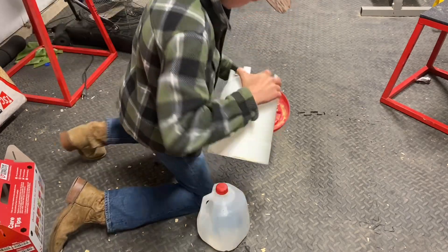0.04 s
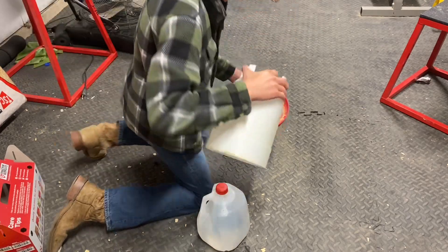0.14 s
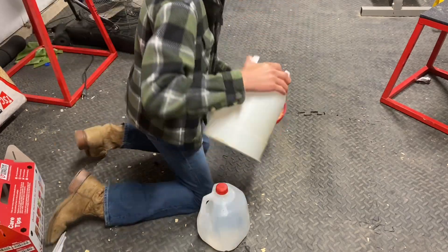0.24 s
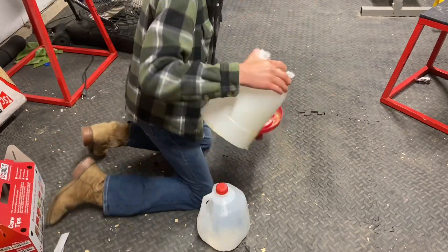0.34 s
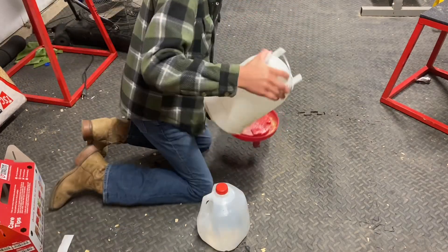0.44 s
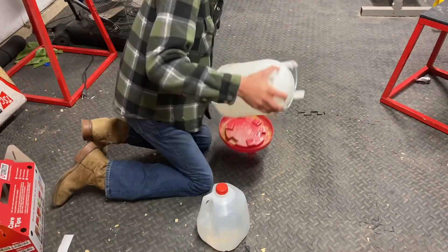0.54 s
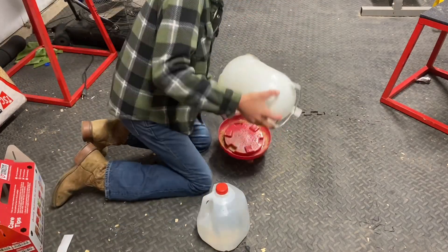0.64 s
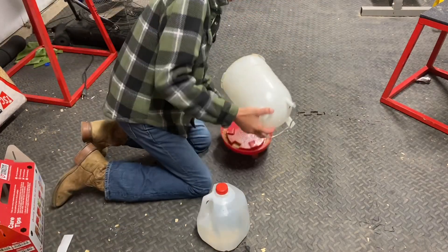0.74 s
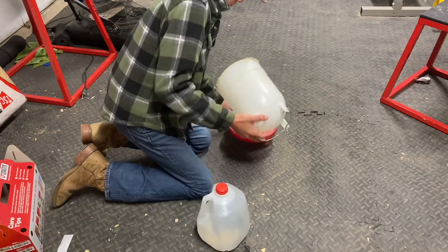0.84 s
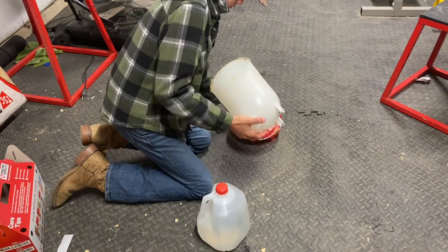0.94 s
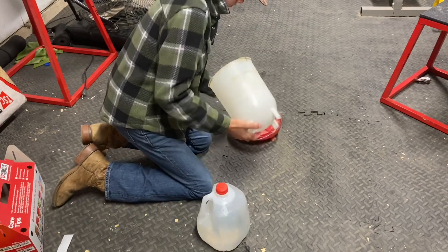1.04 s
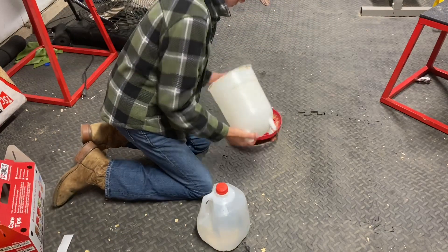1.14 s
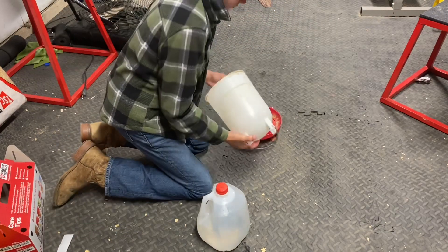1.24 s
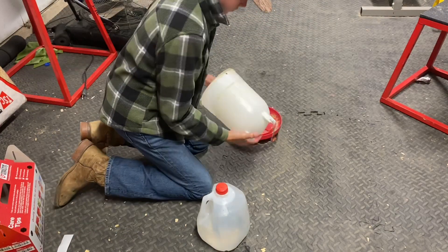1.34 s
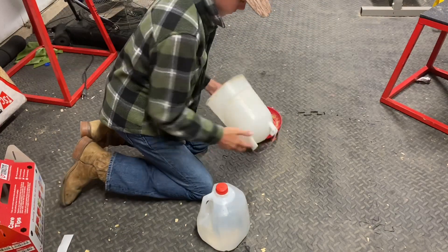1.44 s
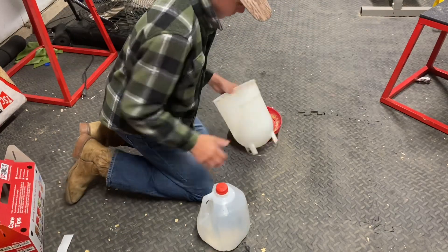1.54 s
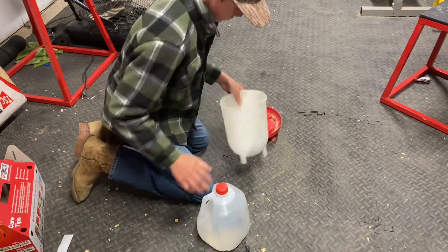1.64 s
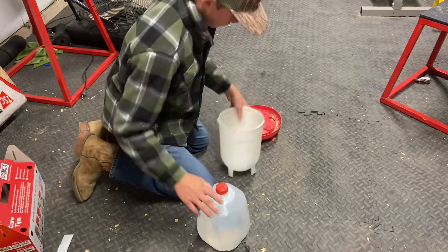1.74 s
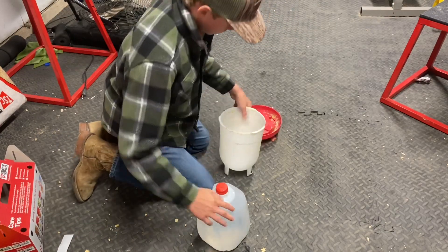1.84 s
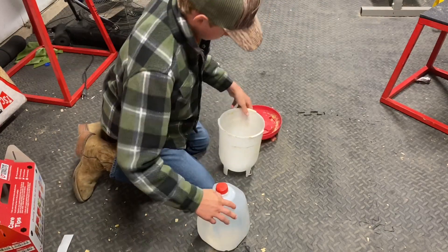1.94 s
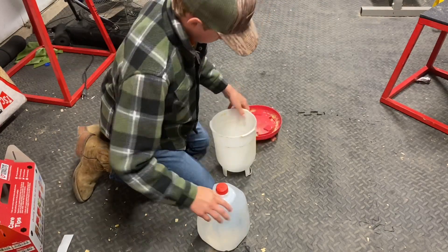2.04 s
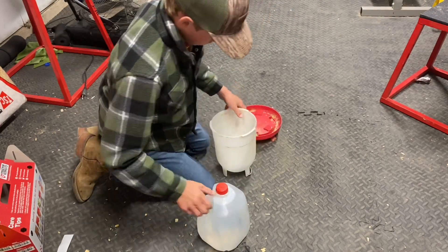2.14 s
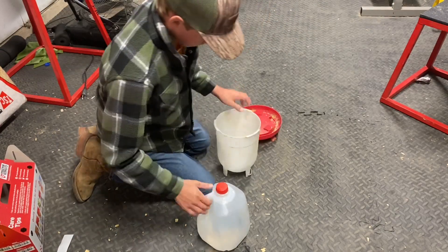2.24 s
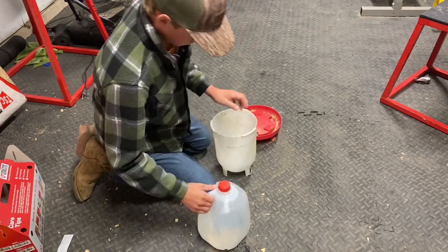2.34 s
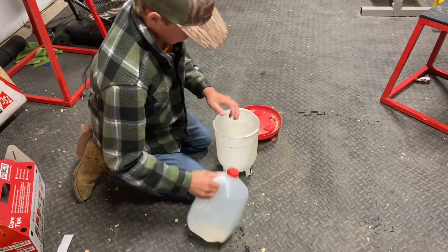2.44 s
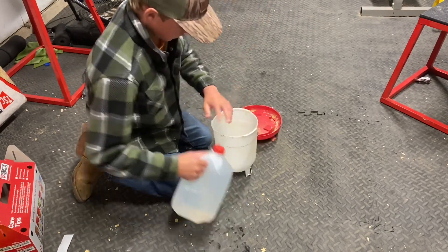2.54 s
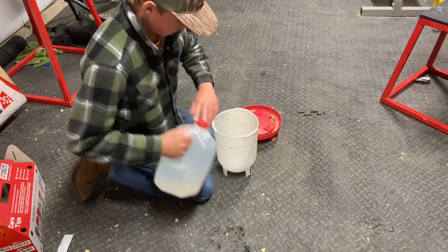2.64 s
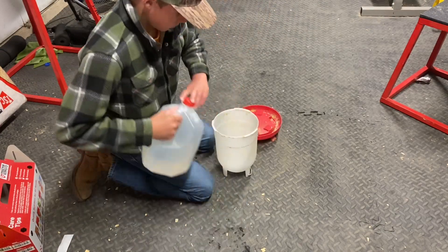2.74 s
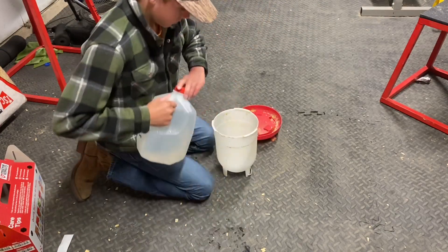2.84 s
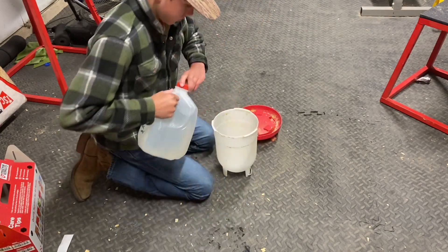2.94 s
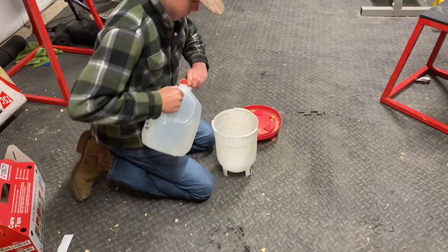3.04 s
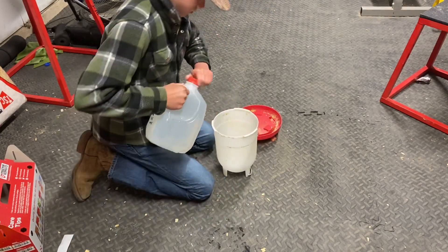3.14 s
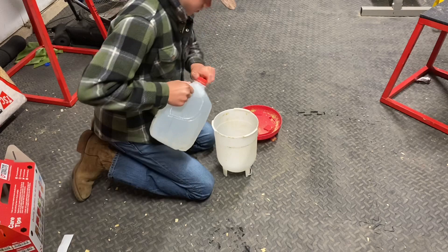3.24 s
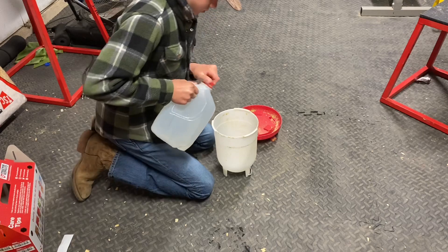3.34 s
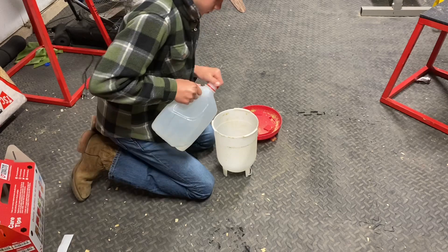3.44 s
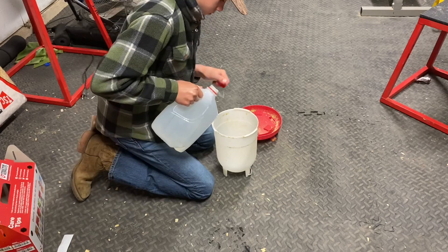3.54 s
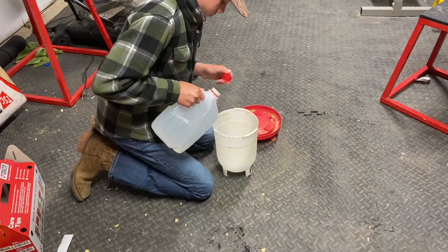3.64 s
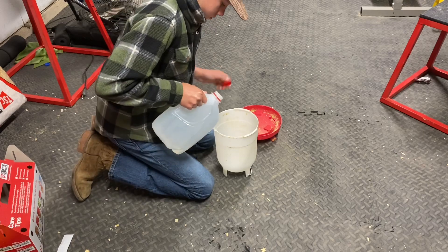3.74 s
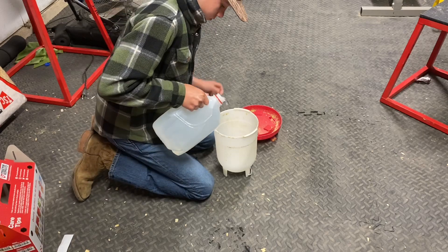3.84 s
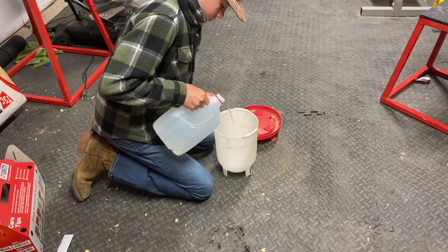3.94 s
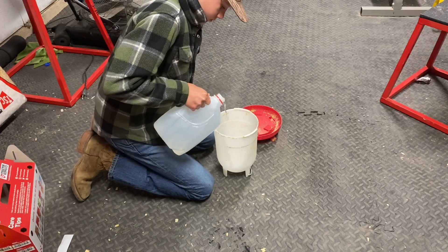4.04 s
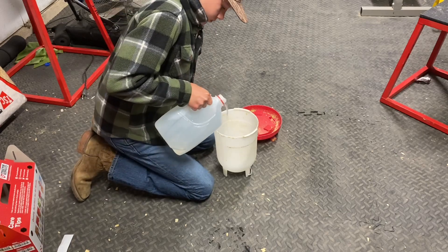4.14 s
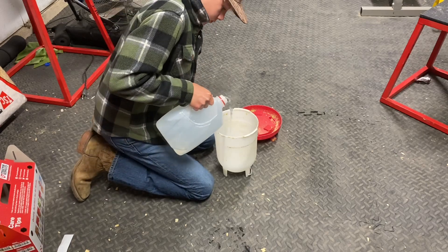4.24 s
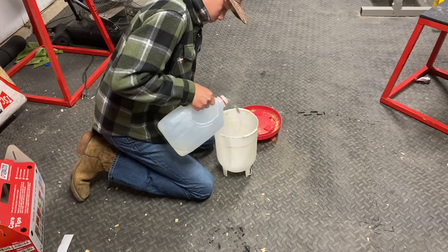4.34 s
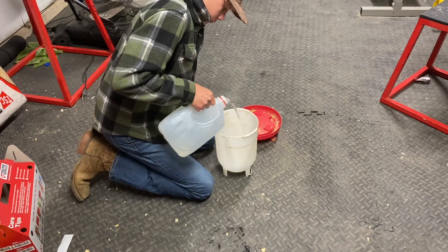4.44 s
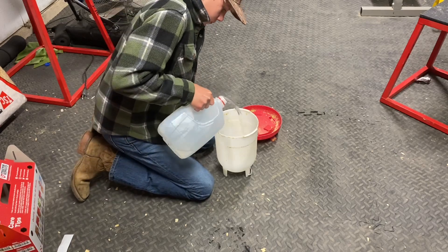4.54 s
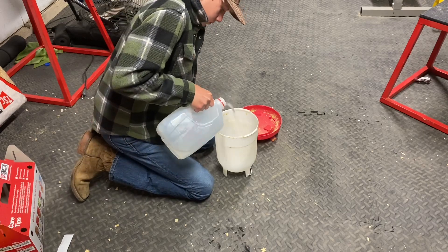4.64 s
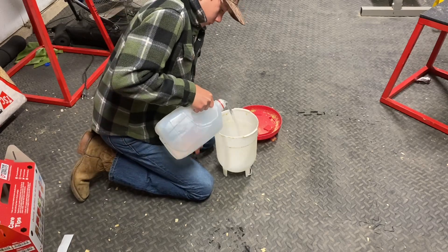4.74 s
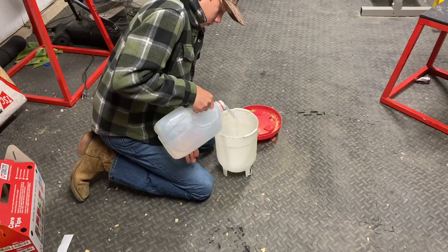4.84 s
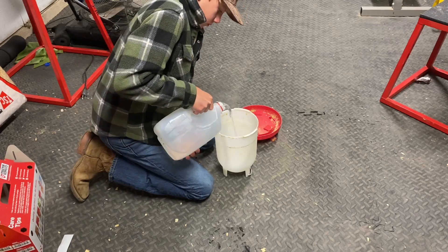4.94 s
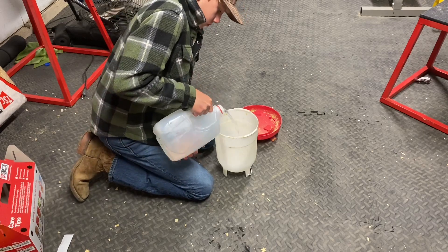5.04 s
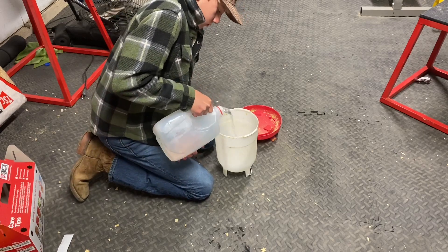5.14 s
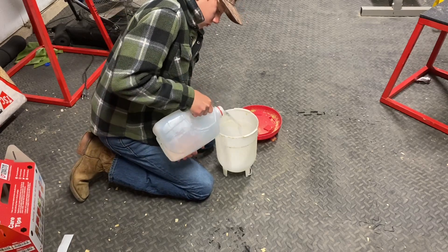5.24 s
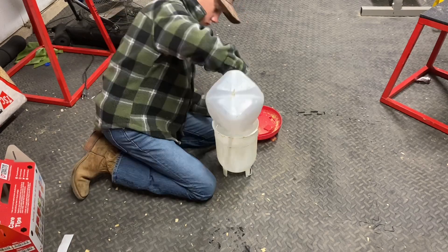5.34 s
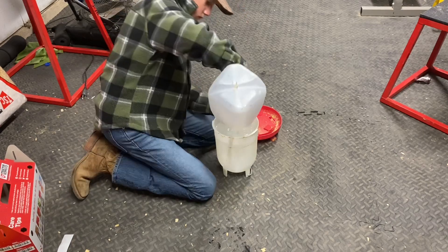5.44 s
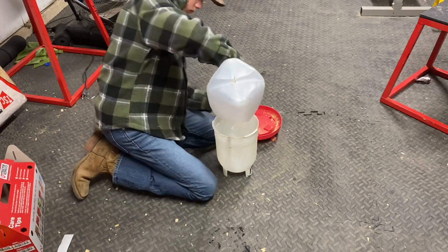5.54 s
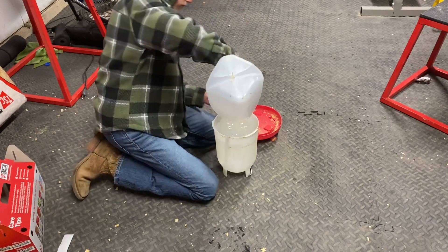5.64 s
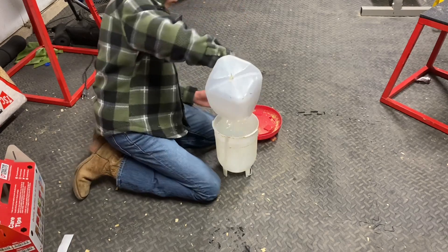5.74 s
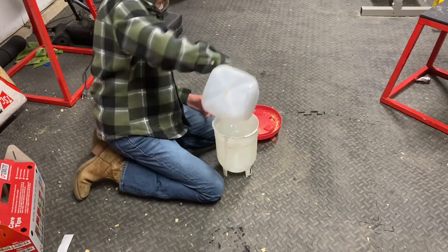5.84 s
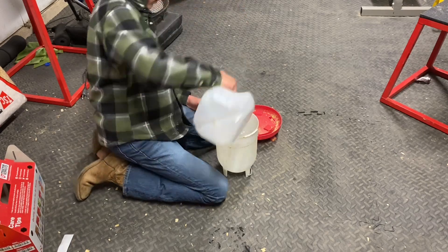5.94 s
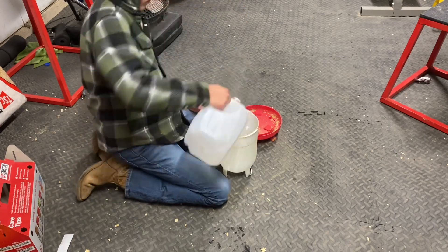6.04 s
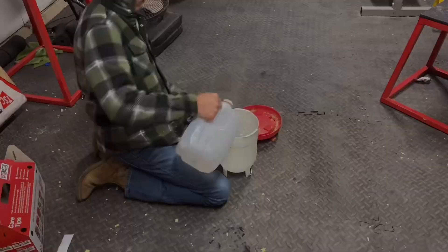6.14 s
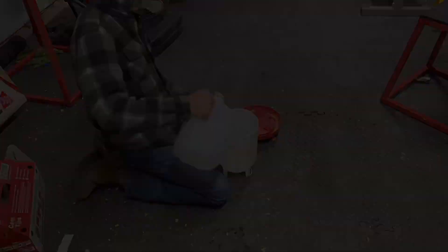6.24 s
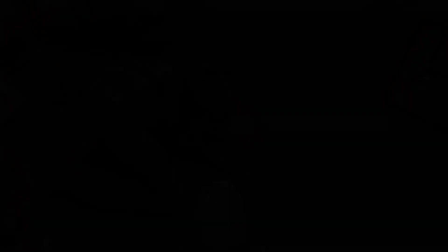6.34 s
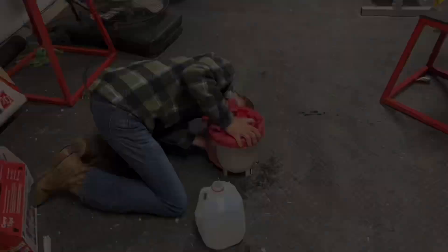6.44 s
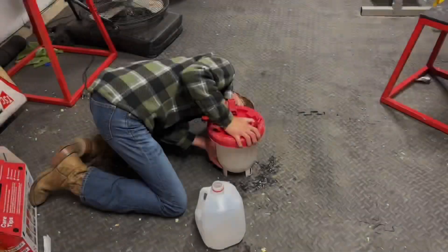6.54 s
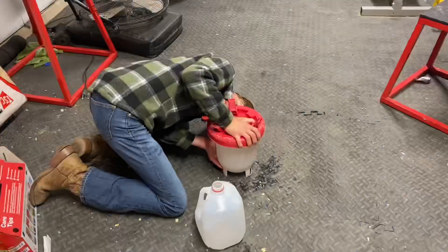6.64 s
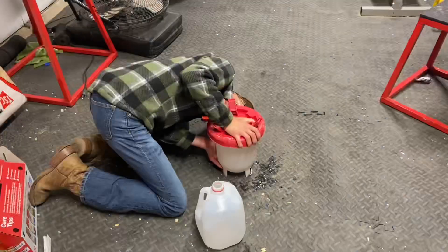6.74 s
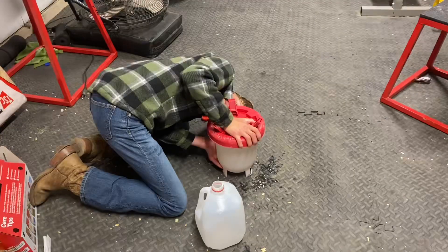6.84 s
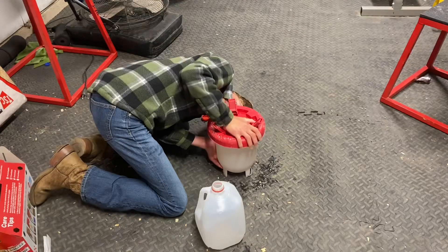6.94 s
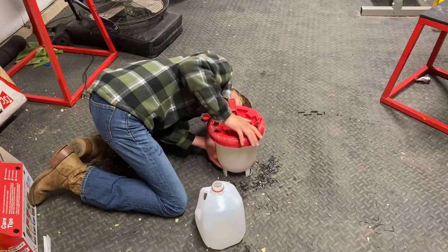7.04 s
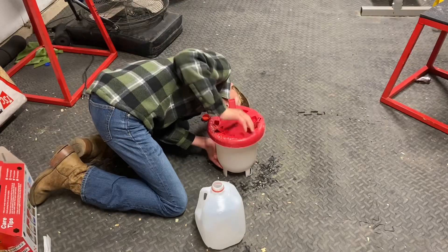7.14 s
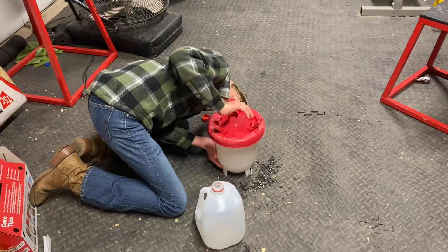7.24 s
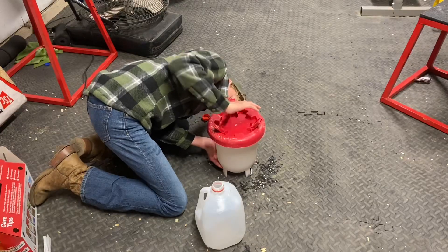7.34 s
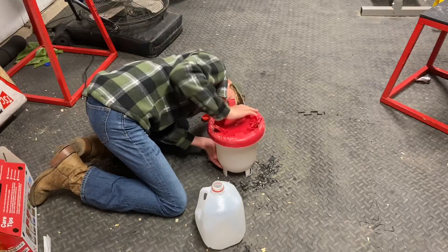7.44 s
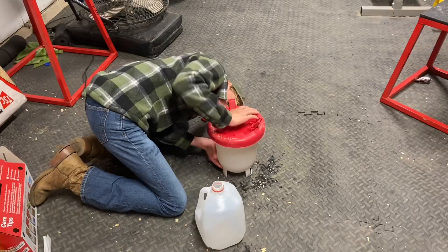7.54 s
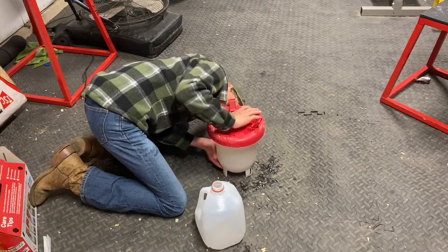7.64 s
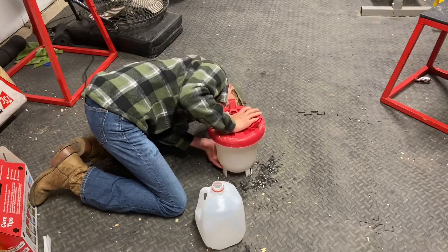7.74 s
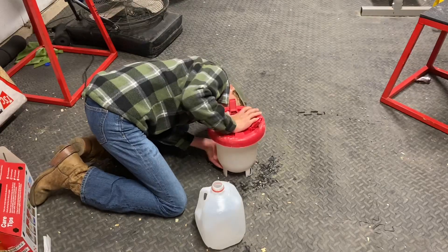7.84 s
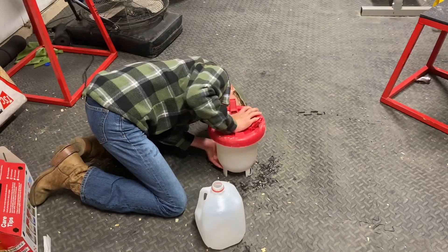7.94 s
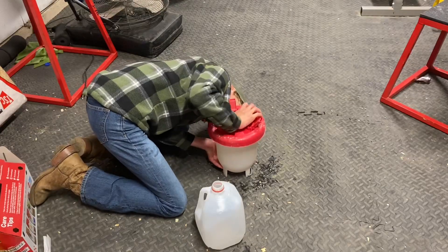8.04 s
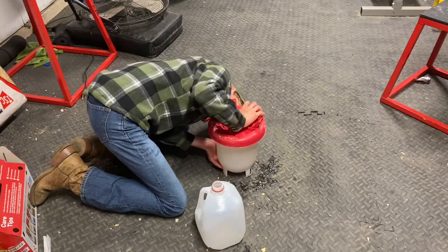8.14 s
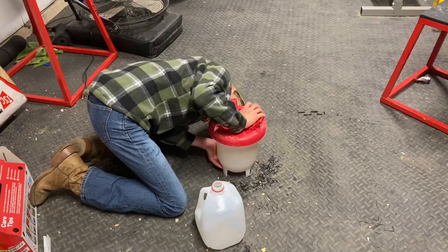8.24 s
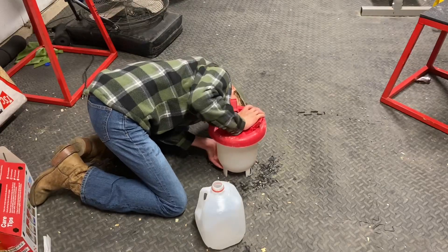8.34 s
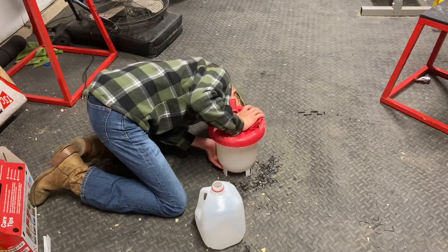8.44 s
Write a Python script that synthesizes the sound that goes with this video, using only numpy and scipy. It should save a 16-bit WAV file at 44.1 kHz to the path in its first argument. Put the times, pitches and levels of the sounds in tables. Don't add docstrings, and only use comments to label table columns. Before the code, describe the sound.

Hollow plastic vessel clatters and booms on a rubber floor, water pours with plops and glugs, then a base is pressed on as chicks peep.

```python
import sys
import numpy as np
from scipy import signal
from scipy.fft import rfft, irfft, next_fast_len
from scipy.io import wavfile
from scipy.ndimage import uniform_filter1d

SR = 44100
rng = np.random.default_rng(int(sys.argv[2]) if len(sys.argv) > 2 else 0)


def dump_mix(stems):
    frames = np.atleast_2d(stems).T
    limited = np.clip(frames, -1, 1)
    pcm = np.round(limited * 32767).astype(np.int16)
    wavfile.write(sys.argv[1], SR, pcm)


def linear_from_db(decibels):
    return 10 ** (np.asarray(decibels, float) / 20)


N = 374346
T = np.arange(N) / SR

# start_s, half_length_s, depth_db
CUTS = [
    (5.382, 0.027, -24),
    (6.347, 0.034, -16),
]
HOLLOW_HZ = 332
THUD_LEFT_DB = -7
PRESENCE_HZ = 4000


def unit(x):
    return x / np.sqrt(np.mean(x ** 2))


def curve(rows):
    s, db = np.transpose(rows)
    return linear_from_db(np.interp(T, s, db, -150, -150))


def colour(x, points):
    hz, db = np.transpose(points)
    size = next_fast_len(N, True)
    f = np.maximum(np.fft.rfftfreq(size, 1 / SR), 1)
    gain = linear_from_db(np.interp(np.log(f), np.log(hz), db))
    return unit(irfft(rfft(x, size) * gain, size)[:, :N])


def band(x, lo_hz, hi_hz):
    sos = signal.butter(2, [lo_hz, min(hi_hz, .45 * SR)], "bandpass", fs=SR, output="sos")
    return signal.sosfilt(sos, x)


def walk(rate_hz):
    k = int(SR / rate_hz)
    steps = np.repeat(rng.standard_normal(N // k + 1), k)
    return unit(uniform_filter1d(uniform_filter1d(steps, k), k)[:N])


def grit(rate_hz, spread_db):
    where, size, sign = rng.random((3, N))
    level_db = np.minimum(-spread_db * np.log(1 - size), 9)
    return (where < rate_hz / SR) * linear_from_db(level_db) * np.sign(sign - .5)


def pair(x, wide):
    return x[0] + wide * x[1] * np.array([[1], [-1]])


def add(out, s, x):
    i = int(s * SR)
    x = x[:N - i]
    out[:, i:i + len(x)] += x


def ring(t, hz, t60_s, rise_s=0.0036):
    decay = np.exp(-np.log(1000) * t / t60_s)
    return np.sin(2 * np.pi * hz * t) * decay * (1 - np.exp(-t / rise_s))


def swells(rows, slopes, column=2):
    rise_db_per_s, fall_db_per_s, rest_db = slopes
    t = T[::32]
    power = linear_from_db(2 * rest_db)
    for row in rows:
        s, hold_s = row[:2]
        end_s = min([cut for cut, _, _ in CUTS if cut > s] + [N])
        rise_db = rise_db_per_s * np.maximum(s - t, 0)
        fall_db = fall_db_per_s * np.maximum(t - s - hold_s, 0)
        power = power + linear_from_db(2 * (row[column] - rise_db - fall_db)) * (t < end_s)
    return np.interp(T, t, np.sqrt(power))


def shed():
    # start_s, level_db
    hum = [(0.0, -63.5), (1.87, -57.5), (2.05, -61), (5.3, -60), (5.41, -69.5), (6.07, -65.5),
           (6.88, -72.5), (7.18, -59.5), (7.3, -61), (7.45, -76.5), (7.73, -83), (8.49, -82.5)]
    # freq_hz, density_db
    spectrum = [(20, -11), (93, 4.5), (175, 1), (312, -7), (787, -39), (1180, -27), (2500, -46.5),
                (5500, -110)]
    noise = pair(colour(rng.standard_normal((2, N)), spectrum), 0.32)
    return noise * linear_from_db(0.37 * walk(11.0)) * curve(hum) * linear_from_db(np.array([[-1.5], [1.5]]))


def chicks():
    # start_s, length_s, start_hz, end_hz, level_db
    peeps = [(.0, 0.0142, 3690, 2880, -60.5), (0.6, 0.04, 3250, 2376, -59.5),
             (3.121, 0.026, 3520, 3350, -64), (3.136, 0.03, 3880, 2475, -52.5),
             (3.366, 0.056, 2655, 1950, -63.5), (3.675, 0.084, 3070, 1722, -60),
             (3.809, 0.021, 3050, 2960, -53), (4.07, 0.0393, 3830, 3590, -62),
             (4.088, .03, 3600, 3180, -58), (5.41, 0.12, 2930, 2596, -55.5),
             (5.719, 0.066, 2996, 2570, -48), (6.025, 0.076, 3053, 2595, -49)]
    # start_s, length_s, start_hz, end_hz, level_db
    brood = [(6.442, 0.031, 3450, 2910, -62), (6.578, 0.047, 4000, 2860, -59.5),
             (6.667, 0.028, 4380, 4130, -72), (6.695, 0.019, 3380, 2745, -60),
             (6.769, 0.053, 3910, 3400, -60), (6.799, 0.015, 4960, 4450, -65.5),
             (6.791, 0.029, 3180, 2670, -58.5), (6.902, 0.067, 4000, 3150, -53.5),
             (6.989, 0.033, 3400, 2710, -77), (6.96, 0.028, 4300, 3770, -62),
             (6.995, 0.03, 5300, 4810, -74), (7.026, 0.062, 3800, 2580, -63),
             (7.064, 0.025, 4200, 3770, -59), (7.268, 0.039, 4470, 4300, -76)]
    # start_s, length_s, start_hz, end_hz, level_db
    plunges = [
        (7.832, 0.066, 4330, 2400, -62),
        (7.994, 0.042, 4850, 3000, -69),
        (8.0, 0.05, 3610, 2550, -58),
        (8.134, 0.034, 3950, 2550, -57),
        (8.258, 0.046, 3850, 2550, -53),
        (8.275, .035, 4150, 2900, -57),
        (8.425, .03, 4250, 4000, -74),
        (8.434, 0.052, 3750, 2450, -54),
    ]
    octave_db, throat_hz, throat_width_hz = -16, 6000, 800
    droop_below_hz = 2250
    brood_lag = 18
    out = np.zeros((2, N))
    waver = 1 + .012 * walk(250)
    flutter = linear_from_db(3.5 * walk(150))
    for s, length_s, start_hz, end_hz, db in peeps + brood + plunges:
        u = np.linspace(0, 1, int(length_s * SR))
        plunging = s >= plunges[0][0]
        droops = end_hz < droop_below_hz
        if plunging:
            fall = 1 - u ** 2
        elif droops:
            fall = 1 - np.where(u < .3, 3 * (.3 - u), (u - .3) / .7) ** 1.2
        else:
            fall = (1 - u ** 1.3) ** 2
        hz = (end_hz + (start_hz - end_hz) * fall) * np.roll(waver, -int(s * SR))[:len(u)]
        phase = 2 * np.pi * np.cumsum(hz) / SR
        throat = np.exp(-((2 * hz - throat_hz) / throat_width_hz) ** 2)
        whistle = np.sin(phase) + linear_from_db(octave_db) * throat * np.sin(2 * phase)
        envelope = np.sin(np.pi * u ** (2 if droops or plunging else 1.4)) ** .6
        add(out, s, linear_from_db(db) * envelope * whistle)
    out[0] = np.where(T > CUTS[-1][0], np.roll(out[0], brood_lag), out[0])
    return out * flutter


def brooder(birds):
    box_t60_s, far_wall_s, far_wall_db = .16, .087, -5
    t = T[:SR // 8]
    smear = rng.standard_normal((2, len(t))) * np.exp(-np.log(1000) * t / box_t60_s)
    smear = smear / np.sqrt(np.sum(smear[0] ** 2))
    boxed = linear_from_db(-5) * birds + signal.fftconvolve(birds, smear, axes=1)[:, :N]
    returned = np.pad(boxed, ((0, 0), (int(far_wall_s * SR), 0)))[:, :N]
    return boxed + linear_from_db(far_wall_db) * returned


def handling():
    # start_s, hold_s, cloth_db, scrape_db, rumble_db
    moves = [(0.0, .01, -59, -57.5, -68.5), (.22, 0.28, -48, -51, -64.5), (.7, 0.0053, -63.5, -45, -60),
             (.98, 0.063, -61, -37.5, -52), (1.37, 0.28, -53, -53, -69.5), (1.785, 0.0057, -49, -36.5, -42),
             (1.84, 0.079, -87, -44, -80.5), (2.38, 0.035, -56, -57, -65), (2.67, 0.051, -61.5, -58, -68),
             (2.92, 0.35, -75, -71.5, -78.5), (3.44, 0.038, -71, -63.5, -63.5),
             (3.78, 0.017, -71.5, -89, -80.5), (6.41, 0.018, -78, -67.5, -69.5),
             (6.94, 0.071, -76, -56, -57.5), (7.15, 0.031, -67.5, -50, -84), (7.93, 0.14, -78, -72, -86.5),
             (8.29, 0.013, -73, -72, -78), (8.48, .02, -72.5, -101.5, -101)]
    # start_s, hold_s, spray_db, wall_patter_db, wall_rumble_db
    surges = [(4.15, 0.0092, -52, -88, -85), (4.26, 0.21, -70, -73, -68), (4.418, 0.033, -51.5, -57, -74),
              (4.525, 0.63, -65.5, -59, -68.5), (4.854, 0.2, -53.5, -45, -75),
              (5.132, 0.052, -51, -45, -59.5), (5.244, 0.035, -56, -48, -81),
              (5.338, 0.0053, -49.5, -58, -92), (5.46, 0.29, -63.5, -58, -83),
              (5.815, 0.25, -57.5, -56, -74.5), (5.948, 0.03, -83.5, -54, -90),
              (6.162, 0.12, -78, -68.5, -77)]
    # start_s, hold_s, level_db
    gusts = [(.71, 0.011, -48.5), (1.05, 0.017, -65), (1.23, 0.22, -52.5), (1.45, 0.22, -60.5),
             (1.79, 0.014, -56), (1.9, 0.068, -42), (3.45, 0.011, -54), (3.78, 0.0059, -57),
             (4.2, 0.14, -57.5), (5.2, 0.066, -57.5), (6.41, 0.065, -56)]
    # freq_hz, density_db
    cloth_spectrum = [(1470, -33.5), (2500, -6), (5870, -4), (8730, -7), (11300, -10), (13500, -13),
                      (14900, -7), (16000, -19.5)]
    # freq_hz, density_db
    scrape_spectrum = [(500, -31), (900, -4), (1300, -6), (1750, -4), (2300, -5.5), (3200, -8),
                       (5000, -16.5), (9000, -48)]
    # freq_hz, density_db
    rumble_spectrum = [(200, -27.5), (400, 9.5), (600, 5.5), (900, -0.5), (1300, -41.5)]
    # rise_db_per_s, fall_db_per_s, rest_db
    cloth_slopes, scrape_slopes = (308, 120, -88), (290, 99.6, -83)
    rumble_slopes, air_slopes = (1100, 75, -94), (840, 160, -100)
    noise = rng.standard_normal((8, N))
    both = moves + surges
    cloth = colour(noise[:2] + 0.23 * grit(1200, 1.7), cloth_spectrum)
    cloth = cloth * linear_from_db(0.56 * walk(25)) * swells(both, cloth_slopes)
    scrape = colour(noise[2:4] + 4 * grit(500, 3), scrape_spectrum)
    scrape = scrape * linear_from_db(2 * walk(40)) * swells(both, scrape_slopes, column=3)
    rumble = colour(noise[4:6], rumble_spectrum)
    rumble = rumble * linear_from_db(2 * walk(25)) * swells(both, rumble_slopes, column=4)
    air = unit(band(noise[6:], HOLLOW_HZ - 20, HOLLOW_HZ + 20)) * swells(gusts, air_slopes)
    solid = linear_from_db(-2.0) * pair(cloth, 0.75) + linear_from_db(-6.0) * pair(scrape, 0.76) + pair(rumble, 0.58)
    return solid + pair(air, .5) * linear_from_db(np.array([[-10], [-1]]))


def bubbles():
    # start_s, level_db
    pour = [
        (4.07, -118),
        (4.15, -66),
        (4.8, -52),
        (4.9, -69),
        (5.35, -54),
        (5.42, -64),
        (5.75, -61),
        (5.95, -50),
        (6.1, -52.5),
        (6.3, -78),
    ]
    start_s, end_s = pour[0][0], pour[-1][0]
    out, t = np.zeros((2, N)), np.arange(1500) / SR
    for when, size, loud in rng.random((150, 3)):
        hz = 1100 * 3 ** size
        phase = 2 * np.pi * hz * t * (1 + 0.0093 * hz * t)
        bubble = np.sin(phase) * np.exp(-t * hz / 3)
        add(out, start_s + when * (end_s - start_s), linear_from_db(7 * loud - 4) * bubble)
    return out * curve(pour)


def glugs():
    # start_s, peak_db, pitch_hz
    gulps = [
        (4.851, -37, 770),
        (5.042, -45.5, 490),
        (5.075, -44, 450),
        (5.118, -43, 423),
        (5.14, -53, 447),
        (5.212, -42.5, 487),
        (5.232, -52, 505),
    ]
    # start_s, peak_db, pitch_hz
    drops = [(3.763, -35, 2100), (3.768, -39.5, 1750), (4.2, -43, 1700), (4.372, -30.5, 2780),
             (4.538, -46, 910), (4.552, -37.5, 2680), (4.69, -41, 1340), (4.79, -40, 3060),
             (4.5215, -38, 1670), (4.568, -41, 1500), (4.6014, -42, 1600), (4.7331, -50, 1960),
             (4.781, -39, 1950), (4.8583, -24.5, 2280), (4.8744, -51, 2240), (4.8917, -30, 1520),
             (5.0594, -30, 1730), (5.1494, -45, 3250), (5.1766, -30.5, 1610), (5.0873, -33.5, 1760),
             (5.1252, -43, 1880), (5.2205, -30, 1650), (5.978, -33, 1580), (5.99, -36, 1170),
             (5.2683, -36, 1670), (5.2994, -63, 1680)]
    out, t = np.zeros((2, N)), np.arange(SR // 10) / SR
    for rows, cycles in ((gulps, 22), (drops, 16)):
        for s, db, hz in rows:
            rising_hz = hz * (1 + 0.0022 * hz * t)
            add(out, s, linear_from_db(db) * ring(t, rising_hz, cycles / hz, rise_s=1.0 / hz))
    return out


def handle():
    # freq_hz, level_db, t60_s
    modes = [(5900, -63, .5), (7154, -62, .5), (7950, -57, .6), (9205, -54, .5), (9738, -52, .6),
             (11310, -53, .6), (15525, -53, .55)]
    start_s, caught_s = 1.787, .3
    out, t = np.zeros((2, N)), np.arange(SR // 2) / SR
    wire = 0 * t
    for hz, db, t60_s in modes:
        rattle = linear_from_db(db + 1.8 * walk(22)[:len(t)])
        wire = wire + rattle * ring(t, hz, t60_s)
    add(out, start_s, wire * np.clip((caught_s - t) / .06, 0, 1))
    return out


def taps(out, rows, walls, walls_db, span, thud_hz, thud_t60_s, chatter_s):
    hard_shortens = 0.14
    t = np.arange(SR // 5) / SR
    half_band = max(span, 1.1)
    modes = sum((linear_from_db(g + walls_db) * ring(t, f, d) for f, g, d in walls), 0 * t)
    for s, db, hz, thud_db, tick_db in rows:
        hiss = rng.standard_normal((2, len(t)))
        chatter = np.clip(chatter_s * linear_from_db(-hard_shortens * (db + 31.5)), .001, .04)
        snap = 0.002 / chatter
        push = 22 * snap * (t == 0) + hiss[0] * np.exp(-t / chatter) * (1 - np.exp(-4 * t / chatter))
        dull = uniform_filter1d(uniform_filter1d(push, size=9, origin=-4), size=5, origin=-2)
        spot = band(push, hz / half_band, hz * half_band)
        spot = spot + 0.054 * band(push, 2300, 4800) + 0.15 * dull
        body = signal.fftconvolve(push, modes)[:len(t)]
        blow = spot + body + 0.52 * snap * ring(t, hz, 0.019, rise_s=0.00025)
        tick = unit(band(hiss[1], 3100, 13000)) * np.exp(-t / 0.0014) / 2
        thud = linear_from_db(db + thud_db) * ring(t, thud_hz, thud_t60_s, rise_s=0.0016)
        add(out, s, linear_from_db(db) * (blow / np.abs(blow).max() + linear_from_db(tick_db) * tick))
        add(out[:1], s, linear_from_db(THUD_LEFT_DB) * thud)
        add(out[1:], s, thud)


def knocks():
    # start_s, peak_db, ring_hz, thud_db, tick_db
    vessel_taps = [(0.201, -50, 1900, -14, 12), (.2242, -47, 2620, -37, -5), (0.256, -47, 980, -11.5, 12),
                   (0.69, -41, 780, -10.5, -4), (.692, -41, 2220, -30.5, -20.5),
                   (.712, -45.5, 820, -9, -28.5), (0.901, -47.5, 770, -26, -36.5),
                   (.912, -44, 760, -26, -27.5), (0.953, -35, 834, -18.5, -22.5),
                   (0.962, -37, 1710, -25, -34), (0.9893, -21, 1640, -45.5, -24.5),
                   (.990, -25.5, 774, -42, -41.5), (0.996, -28, 805, -22, -39.5),
                   (1.0, -27, 1380, -29, -28.5), (1.002, -32.5, 2370, -38, -32.5),
                   (1.026, -38, 2380, -39.5, -29.5), (1.014, -32, 870, -29.5, -34),
                   (1.048, -41.5, 765, -16, -40), (1.078, -35.5, 1790, -11, -31),
                   (1.211, -52.5, 340, 9, -40), (1.347, -42, 923, -22, -9.5), (1.36, -33.5, 2310, -37, -49),
                   (1.649, -40.5, 3000, -9, 3), (1.762, -33.5, 1580, -5, -22),
                   (1.769, -30, 1770, -0.5, -17), (1.783, -31.5, 1780, -12, -18),
                   (1.7869, -25.5, 2420, -30.5, -0.5), (1.791, -22.5, 1870, -27.5, -20.5),
                   (1.816, -32, 1760, -30, -19), (1.832, -35, 2150, -22.5, -30),
                   (1.85, -31, 1800, -21.5, -33.5), (1.873, -38.5, 1800, -23, -31),
                   (1.884, -29.5, 1760, -9.5, -29), (1.907, -37.5, 1770, -28, -34),
                   (1.9116, -20, 1740, -41, -38), (1.945, -37, 2150, -29.5, -51),
                   (1.97, -35, 1950, -26, -40), (2.205, -52, 1710, 1.5, -16), (2.462, -50.5, 1480, -26, -7)]
    # start_s, peak_db, ring_hz, thud_db, tick_db
    jug_taps = [(2.321, -55.5, 416, 3, -23.5), (2.537, -48.5, 4000, -4.5, 7.5), (2.994, -61.5, 1570, 1, 8),
                (3.215, -47, 2440, -11, -15), (3.423, -51.5, 676, -9, -31), (3.448, -45, 727, -7, -4),
                (3.641, -57.5, 1180, -6, -7), (3.764, -55.5, 1870, -7, -30), (5.328, -29.5, 5600, -30, -16),
                (5.489, -47, 4240, -29.5, -16), (5.514, -44, 4730, -32, -24), (5.98, -43, 1550, -43, -22),
                (6.399, -40.5, 284, -7, -38), (6.404, -42.5, 697, -19, -38), (6.409, -45, 1160, -40, -39),
                (6.918, -47.5, 612, -16, -32), (7.733, -69.5, 620, 2, -35.5)]
    # start_s, peak_db, ring_hz, thud_db, tick_db
    soft_taps = [
        (.134, -56, 650, -12, -40),
        (1.371, -42, 266, -3.5, -40),
        (2.599, -54, 700, -10, -40),
        (2.659, -58, 277, -13, -40),
        (3.199, -56.5, 600, -4, -40),
        (3.899, -66.5, 600, -7, -45),
        (7.749, -69, 240, -7, -40),
        (8.159, -67.5, 285, -9, -41),
    ]
    # start_s, peak_db, ring_hz, thud_db, tick_db
    splashes = [(4.078, -47.5, 1590, -19, -21), (4.118, -44, 1800, -8.5, 12),
                (4.1425, -24, 2520, -62, -26.5), (4.144, -30.5, 1730, -66, -40),
                (4.15, -29, 2310, -52.5, -32.5), (4.161, -31, 2350, -22.5, -20.5),
                (4.311, -39.5, 2220, -22.5, -33), (4.392, -36.5, 1950, -15, -5.5),
                (4.417, -38, 4380, -65, -5), (4.42, -41.5, 2300, -73, -30), (4.655, -46.5, 1570, -23, -29),
                (4.839, -34.5, 1660, -20, -4), (4.95, -46, 1930, -61, 4), (5, -39, 1860, -38, -15),
                (5.038, -45, 2040, -17, -19), (5.211, -43, 516, -38, -30)]
    # start_s, peak_db, ring_hz, thud_db, tick_db
    base_taps = [
        (7.111, -34.5, 1010, -31, -37),
        (7.112, -49, 2090, -30, -22),
        (7.153, -36, 1010, -8, -37),
        (7.154, -50, 2300, -32, -20),
        (7.318, -62, 1946, 5.5, -24),
        (7.377, -62, 437, -29.5, -4),
        (8.274, -58, 2040, -6, -2),
    ]
    # start_s, peak_db
    ticks = [(0.096, -52), (0.1127, -44.5), (0.132, -42.5), (.17, -46), (1.638, -61), (2.9173, -60),
             (2.962, -67), (3.786, -53), (5.082, -37.5), (5.429, -76), (5.825, -52), (6.043, -52),
             (6.062, -38), (6.068, -55), (6.075, -46), (6.218, -67), (6.278, -66), (6.305, -74),
             (6.945, -79)]
    # freq_hz, level_db, t60_s
    vessel = [(766, -5, 0.033), (870, -22, 0.026), (1370, 9.5, 0.021), (1590, -9, 0.081), (1760, -5, 0.017),
              (1950, -6, 0.0044)]
    # freq_hz, level_db, t60_s
    base = [(435, 4, 0.1), (980, -23, 0.11), (1300, 29, 0.0069), (1980, 16.5, 0.014)]
    # start_s, level_db, rise_s, t60_s
    set_down = (1.787, -15, .025, .085)
    out, t = np.zeros((2, N)), np.arange(400) / SR
    taps(out, vessel_taps, vessel, -40.0, 1.222, HOLLOW_HZ, 0.14, 0.0066)
    taps(out, jug_taps + soft_taps, [], 0, 1.77, 155.7, 0.086, 0.0057)
    taps(out, splashes, [], 0, 1.15, 358, 0.12, 0.0028)
    taps(out, base_taps, base, -44, 1.83, 290, 0.056, 0.0061)
    boom_s, boom_db, rise_s, t60_s = set_down
    boom = linear_from_db(boom_db) * ring(T[:SR // 4], HOLLOW_HZ, t60_s, rise_s=rise_s)
    add(out[:1], boom_s, linear_from_db(THUD_LEFT_DB) * boom)
    add(out[1:], boom_s, boom)
    for s, db in ticks:
        nail = unit(band(rng.standard_normal(len(t)), 5900, 15000))
        add(out, s, linear_from_db(db - 3.5) * nail * np.exp(-t / 0.003))
    return out


def echoes(x):
    # freq_hz, t60_s
    room_t60 = [(200, 0.49), (1000, 0.55), (3000, 0.5), (8000, 0.37), (16000, 0.035)]
    treble_db = -6
    t, (hz, t60_s) = np.arange(SR) / SR, np.transpose(room_t60)
    tail = np.zeros((2, SR))
    for f in 125 * 2. ** np.arange(8):
        octave = band(rng.standard_normal((2, SR)), f / np.sqrt(2), f * np.sqrt(2))
        decay = np.exp(-np.log(1000) * t / np.interp(np.log(f), np.log(hz), t60_s))
        tail += octave * decay * linear_from_db(treble_db * (f > PRESENCE_HZ))
    tail = tail * np.clip((t - .004) / .006, 0, 1) * linear_from_db(1.5 * walk(250)[:SR])
    return signal.fftconvolve(x.mean(0, keepdims=True), unit(tail) / np.sqrt(SR), axes=1)[:, :N]


def scene():
    blows, birds, water = knocks(), chicks(), bubbles() + glugs()
    wet = echoes(linear_from_db(-1) * blows + linear_from_db(3) * birds + linear_from_db(-3) * water)
    low = band(wet, 250, 440)
    wet = wet - .7 * low + low[1] * linear_from_db(np.array([[THUD_LEFT_DB - 3], [-3]]))
    direct = linear_from_db(4) * blows + brooder(birds) + water
    return shed() + handling() + handle() + direct + wet


def top_cut(x):
    return signal.sosfilt(signal.butter(12, 16580, fs=SR, output="sos"), x)


def record(dry):
    # freq_hz, gain_db
    ports = [(7700, 0), (8500, -2), (9400, -4), (15750, -4.5), (15900, -32), (16500, -36), (16600, -60)]
    # freq_hz, share
    shared = [(7200, 0), (7900, .75), (9500, .8), (10300, .96), (12500, .92), (14500, .96)]
    # freq_hz, half_turns
    turn = [(7300, 0), (7900, -.9), (9000, -.9), (10300, 0), (11600, 0), (12500, 1), (14200, 1), (15100, 2)]
    port_lag = 1.45
    left_presence_db = 1
    size = next_fast_len(N + 64, True)
    hz = np.fft.rfftfreq(size, 1 / SR)
    tilt = linear_from_db(left_presence_db / 2 * np.exp(-(2 * np.log((hz + 1) / PRESENCE_HZ)) ** 2))
    left, right = rfft(dry, size) * linear_from_db(np.interp(hz, *np.transpose(ports)))
    share = np.interp(hz, *np.transpose(shared))
    own = right * np.exp(-2j * np.pi * hz / SR * port_lag)
    common = left * np.exp(1j * np.pi * np.interp(hz, *np.transpose(turn)))
    right = np.sqrt(1 - share ** 2) * own + share * common
    heard = irfft(np.array([left * tilt, right / tilt]), size)[:, :N]
    dip_db = sum(db * np.clip(1 - np.abs(T - s) / half_s, 0, 1) for s, half_s, db in CUTS)
    return top_cut(heard * linear_from_db(dip_db))


dry = scene()
out = record(dry)
dump_mix(out)
```